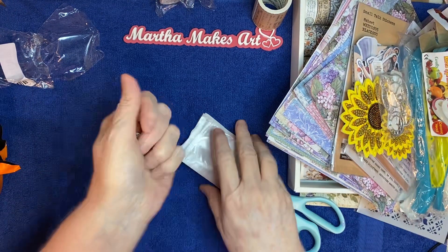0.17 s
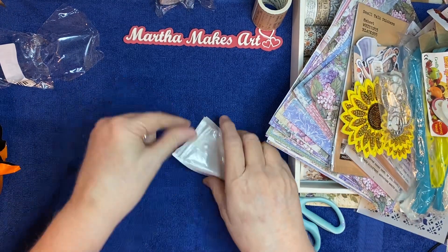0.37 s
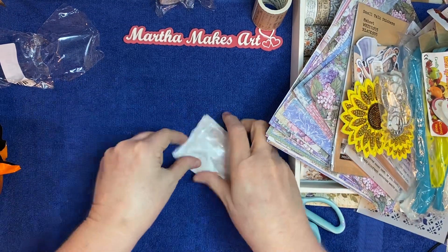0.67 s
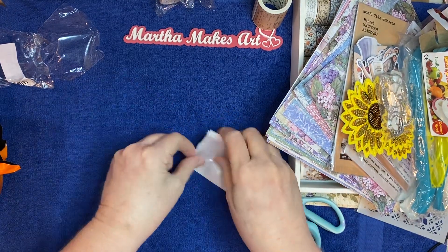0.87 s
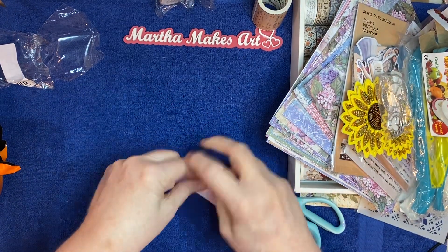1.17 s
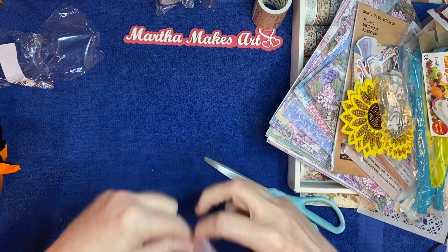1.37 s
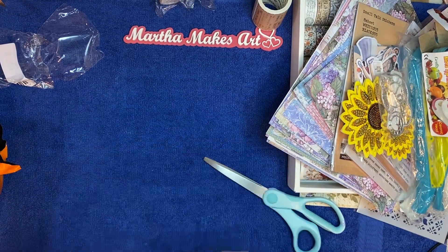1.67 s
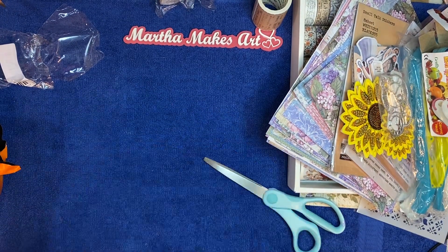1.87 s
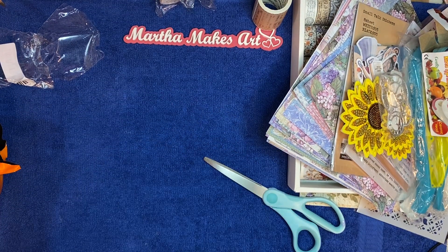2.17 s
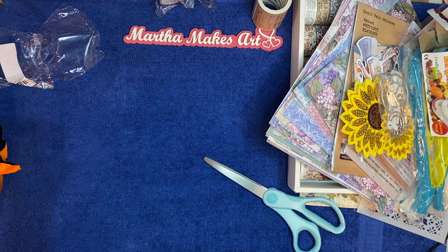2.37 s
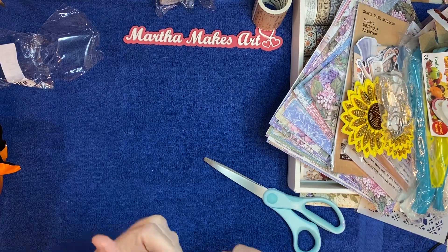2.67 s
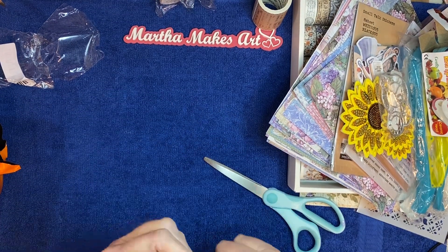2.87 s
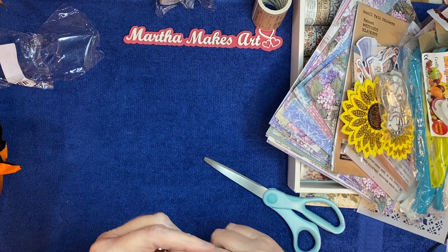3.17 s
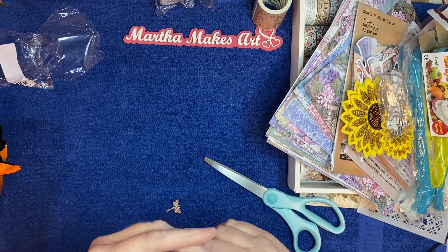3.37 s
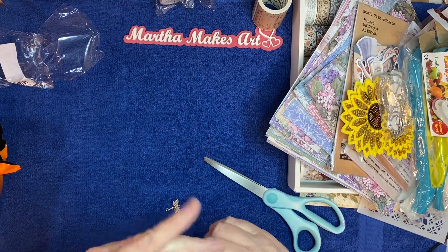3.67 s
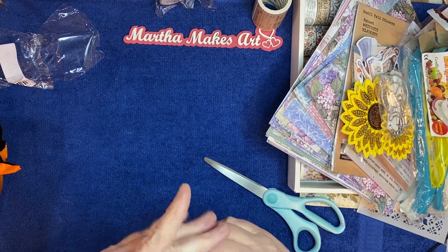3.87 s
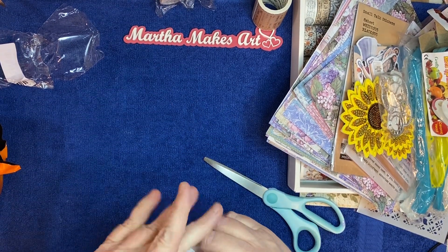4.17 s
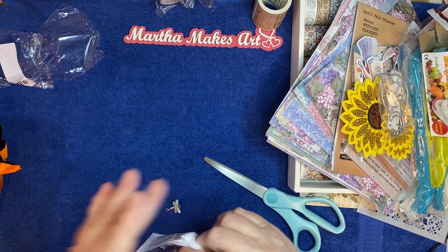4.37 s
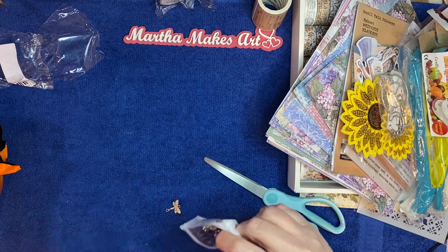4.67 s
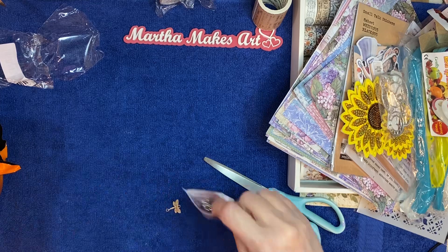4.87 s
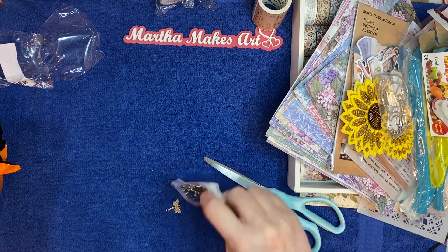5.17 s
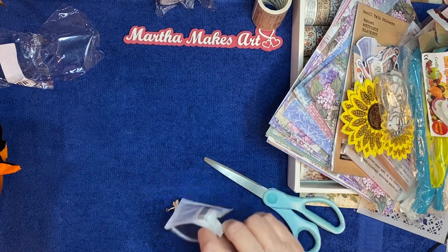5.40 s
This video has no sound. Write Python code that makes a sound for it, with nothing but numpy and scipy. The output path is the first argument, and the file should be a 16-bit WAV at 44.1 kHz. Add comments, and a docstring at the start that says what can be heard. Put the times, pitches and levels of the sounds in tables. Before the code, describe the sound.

Faint metal ticks begin, then thin film pops and crinkles, growing busier and louder before stopping. A lull leaves a quiet low hum and soft air. Metal charms then rattle in quick dry clicks, damped by bag and hand, with one late clatter. Very light film touches end it. Recorded near in a small, fairly dry room with narrow stereo.

```python
"""Thin plastic bag with metal charms

Hands work open a small, thin plastic bag at a cloth-covered table: the film rustles and snaps.
Small metal charms then slide and click inside it, and a last clatter follows as they are dropped.
Snaps and knocks are shaped noise bursts; rubbing is a dense train of tiny slips; bumps are damped sines.
A small room adds reflections and an appliance hums, heard through two closely spaced microphone ports."""
import sys
import numpy as np
from scipy import signal
from scipy.fft import rfft, irfft
from scipy.io import wavfile
from scipy.ndimage import uniform_filter1d

SR = 44100
rng = np.random.default_rng(int(sys.argv[2]) if len(sys.argv) > 2 else 0)


def wav_record(signal):
    """Record a signal, one row per channel, as 16-bit PCM in the file named by sys.argv[1]."""
    frames = np.transpose(np.atleast_2d(signal))
    bounded = np.clip(frames, -1, 1)
    # unit amplitude maps onto the largest positive 16-bit level
    quanta = np.round(bounded * 32767).astype(np.int16)
    wavfile.write(sys.argv[1], SR, quanta)


N = 244314  # samples

# All levels are relative: later gains scale each layer.
# Tones of the appliance motor and the mains: (f/Hz, level/dB)
HUM_TONES = [(44.2, -63), (58.6, -47), (104.5, -60), (117.3, -63), (120, -52), (171.3, -63), (240, -62),
             (1174, -75)]
# Colour of the moving air in the room: (f/Hz, spectral density level/dB)
AIR_COLOUR = [(25, -11.5), (52, 3), (90, -1.5), (300, -5.5), (410, 0), (600, -11.5), (1100, -16),
              (2200, -32.5), (3300, -43), (15000, -42.5)]

# Fingers stroke the film; the first, long stroke is the grip that holds the bag:
# (start t/s, length t/s, level/dB)
FILM_STROKES = [(0.18, 2.29, -57), (0.03, 0.12, -59.5), (0.174, 0.092, -48.5), (0.29, 0.23, -61),
                (0.765, 0.019, -40), (0.87, 0.083, -44.5), (1.35, 0.02, -42), (1.89, 0.18, -44),
                (2.60, 0.39, -64.5), (2.97, 0.079, -51), (3.83, 0.023, -46.5), (4.45, 0.11, -58.5),
                (4.7, 0.57, -66), (4.995, 0.047, -48), (5.05, 0.095, -61)]
STROKE_ATTACK_S, STROKE_RELEASE_S = 0.022, 0.011
HOLDING_DB = -70.5  # the film stirs faintly between strokes
# The film buckles: (t/s, level/dB, treble level/dB, resonance f/Hz, t60/s, at least 0.003 in use)
FILM_SNAPS = [(0.301, -22, -3, 1820, 0.0093), (0.334, -29.5, -10, 2250, 0.011),
              (0.485, -24, -6.5, 2580, 0.0062), (0.553, -28.5, -10.5, 3530, 0.0045),
              (0.638, -21.5, -5, 2200, 0.0097), (0.677, -26.5, -6, 2500, 0.017),
              (0.6898, -25.5, -18, 2550, 0.0078), (0.8222, -44, 4.5, 5380, 0.005),
              (0.862, -33, -10, 2300, 0.022), (0.8882, -18, -18.5, 2440, 0.0078),
              (0.8937, -20.5, -0.5, 6200, 0.012), (0.9037, -27, 6.5, 9100, 0.0024),
              (0.916, -25, -41, 2210, 0.0043), (0.9635, -36.5, 4.5, 5100, 0.012),
              (0.990, -30.5, 4.5, 6760, 0.012), (1.000, -31, -4, 2300, 0.02),
              (1.040, -30.5, 0, 7600, 0.011), (1.0913, -41.5, -5.5, 1420, 0.022),
              (1.130, -20.5, -1, 4000, 0.012), (1.153, -27.5, -30, 2100, 0.014),
              (1.208, -37, -17.5, 1640, 0.016), (1.232, -23, -31, 4300, 0.013),
              (1.2391, -21, -0.5, 5340, 0.0094), (1.2577, -31.5, 2.5, 3100, 0.016),
              (1.391, -30.5, -13, 3750, 0.013), (1.4034, -38, -2, 2630, 0.0075),
              (1.4482, -41, 7, 1970, 0.035), (1.542, -33, -26, 2820, 0.014),
              (1.588, -33, -4.5, 4900, 0.023), (1.636, -37, -4, 1880, 0.013),
              (1.653, -20.5, 1.5, 3700, 0.0073), (1.6558, -16.5, -1.5, 3200, 0.0039),
              (1.662, -28, -12.5, 3150, 0.013), (1.749, -21.5, 0, 3300, 0.007),
              (1.757, -17.5, 1, 4700, 0.013), (1.773, -27.5, -8, 2700, 0.025),
              (1.874, -22, -4, 3630, 0.014), (1.898, -23, -16, 4200, 0.01),
              (1.9185, -13.5, -5.5, 4940, 0.011), (1.9405, -14, 2.5, 6940, 0.017),
              (1.9525, -19.5, -5, 2350, 0.017), (1.970, -16, -10, 5000, .021),
              (2.025, -13.5, -3, 2110, 0.017), (2.040, -30, -11.5, 2460, 0.012),
              (2.093, -26.5, -0.5, 7600, 0.0069), (2.164, -25, -5.5, 2440, 0.013),
              (2.225, -24, -21, 2480, 0.016), (2.2844, -32.5, -3, 1460, 0.021),
              (2.297, -19, -8.5, 2430, 0.018), (2.393, -24.5, -3, 6540, 0.0089),
              (2.4407, -29.5, -7, 1926, 0.005), (4.823, -61, 7, 2400, 0.017),
              (4.8665, -52, -15, 1720, 0.027), (5.083, -49, -5, 2500, 0.016)]
SNAP_WIDTH_HZ = 240  # half-width of the leading resonance when it lies at 2500 Hz
# Colours of a snap, a light swish and the crinkle of a firm touch: (f/Hz, spectral density level/dB)
FILM_COLOUR = [(200, -8), (400, -3.5), (650, -2.5), (1050, -10), (1500, -3), (2300, -1.5), (3200, -6),
               (5000, -1.5), (6200, -5.5), (8000, -3.5), (10000, -3), (12500, -9.5), (15500, -7)]
SWISH_COLOUR = [(1000, 4), (2300, 1.5), (3300, -2), (5500, -3), (15000, -5)]
CRINKLE_COLOUR = [(1400, -1), (2400, 4.5), (3400, -8.5), (5300, -0.5), (10000, -10.5), (15000, -5)]
CLUMP_HZ = 30  # rate at which the slips of each fold swell and rest

# Loose charms shift and tinkle: (start t/s, length t/s, level/dB)
CHARM_TINKLES = [(0.06, 0.018, -43), (0.11, 0.01, -40.5), (2.615, 0.012, -50), (2.87, 0.096, -52),
                 (2.98, 0.14, -45), (3.34, 0.03, -51), (3.67, 0.042, -42), (4.43, 0.12, -53),
                 (4.995, 0.05, -51)]
# Charms knock together in the bag and the hand:
# (t/s, level/dB, treble level/dB, resonance f/Hz, t60/s)
CHARM_KNOCKS = [(2.992, -41, -6, 1780, 0.0143), (3.018, -36.5, 9.5, 1910, .012),
                (3.092, -27, -5, 1906, 0.011), (3.1005, -28, -5, 1673, 0.0068),
                (3.141, -15.5, -8.5, 1584, .016), (3.2065, -25.5, -3, 6480, 0.011),
                (3.2187, -27.5, -1, 1760, 0.015), (3.2695, -26.5, 8.5, 7640, 0.019),
                (3.286, -18.5, -1, 1364, 0.029), (3.3455, -17, 4, 7920, 0.021),
                (3.3645, -23.5, 1, 6650, 0.017), (3.398, -26, -11, 1540, 0.022),
                (3.4152, -16.5, -2.5, 7450, 0.037), (3.466, -21.5, 3.5, 1470, 0.031),
                (3.514, -28.5, -3, 5200, 0.01), (3.5325, -19.5, -5, 2380, 0.0088),
                (3.562, -18.5, -0.5, 5250, .011), (3.6025, -11.5, 1, 5100, 0.025),
                (3.6155, -21.5, 5, 1530, 0.094), (3.675, -23.5, 6, 2580, 0.055),
                (3.727, -40.5, 12, 10800, 0.01), (3.7397, -29.5, -12, 2190, 0.0054),
                (3.825, -39, 10, 2450, 0.0051), (3.8855, -36, 1, 2490, 0.0129),
                (3.903, -39, -1, 5640, 0.03), (3.9332, -30, 6, 9500, 0.0116),
                (4.1962, -36, 0, 1830, 0.0282), (4.2445, -16, 4, 2410, 0.026),
                (4.2495, -19, -8, 1610, 0.029), (4.422, -51, 18, 9430, 0.007)]
KNOCK_LEAD_S = 0.0032  # a charm scrapes only briefly before it knocks
# Charms slide along the bag; the first, long slide runs under the short pushes:
# (start t/s, length t/s, level/dB)
CHARM_SLIDES = [(3.12, 0.6, -44.5), (3.123, 0.03, -33.5), (3.375, 0.026, -39.5), (3.453, 0.062, -40.5),
                (3.538, 0.025, -44), (3.598, 0.12, -42), (4.226, 0.0165, -45)]
SLIDE_ATTACK_S, SLIDE_RELEASE_S = 0.0048, 0.008
# Colours of the tinkle and of the knocks and scrapes: (f/Hz, spectral density level/dB)
TINKLE_COLOUR = [(3000, -13), (5500, -24), (7700, 5), (10000, -13), (12500, -9), (15500, -5)]
CHARM_COLOUR = [(250, 1), (430, 4.5), (650, 4), (1050, -5), (1500, -6.5), (2300, -5.5), (3200, -7.5),
                (5000, -8.5), (6200, -10), (8200, -4), (10000, -17), (12500, -19), (15500, -18)]
# Resonances that every charm knock and scrape shares: (f/Hz, width/Hz, level/dB)
SHARED_MODES = [(1556, 270, 1.5), (2570, 77, -2.5)]

# Hands bump the padded table: (t/s, level/dB, f/Hz)
TABLE_THUMPS = [(3.27, -33.5, 245), (3.286, -38, 74), (3.642, -34, 148), (3.657, -40, 68),
                (3.675, -38.5, 230)]

# Decay of the room: (f/Hz, t60/s)
ROOM_DECAY = [(500, 0.32), (3000, 0.25), (16000, 0.033)]
# Likeness of the diffuse sound at the two ports: (f/Hz, likeness from 0 to 1)
PORT_LIKENESS = [(100, 1), (300, 0.71), (900, 0.09), (3000, 0), (8000, 1), (16000, 0.1)]
# Lead of the left port over the right: (f/Hz, phase/rad)
PORT_LEAD = [(0, 0), (1400, -.5), (2000, 0), (3000, 1.1), (3600, .4), (4400, .8), (5100, .1), (7300, 3.1),
             (9800, 6.1), (11200, 6.6), (16000, 12)]
# Left port minus right: (f/Hz, level difference/dB)
PORT_LEVEL = [(100, -1), (400, -1), (800, 6), (1400, -1), (2600, -2.5), (3500, -0.5), (4500, -2.5),
              (5500, -0.15)]
BAND_EDGE_HZ = 16300


def gain_of(db):
    """Decibels are a logarithmic measure of amplitude."""
    return 10 ** (np.asarray(db) / 20)


def evened(x):
    """Normalisation: the root mean square becomes 1."""
    return x / np.sqrt(np.mean(x ** 2) + 1e-20)


def read(points, hz):
    """Interpolation of a table along a logarithmic frequency axis."""
    f, value = np.transpose(points)
    return np.interp(np.log(hz + 1), np.log(f + 1), value)


def bins(size):
    """Frequencies of the discrete spectrum of this many samples."""
    return np.fft.rfftfreq(size, 1 / SR)


def add(mix, s, sound):
    """Superposition: a sound joins the mix at time s."""
    part = mix[max(round(s * SR), 0):][:len(sound)]
    part += sound[:len(part)]


def causal(gain):
    """Minimum phase: a filter of this magnitude does not respond before it is excited."""
    cepstrum = irfft(np.log(np.maximum(gain, gain.max() * 1e-5)))
    half = len(cepstrum) // 2
    # fold the cepstrum onto positive time
    cepstrum[1:half] *= 2
    cepstrum[half + 1:] = 0
    return np.exp(rfft(cepstrum))


def radiated(colour, hz, corner_hz=190):
    """Radiation of a small object: its colour, with little bass."""
    return gain_of(read(colour, hz)) * hz ** 2 / (hz ** 2 + corner_hz ** 2)


def diffuse(pair):
    """Partial coherence: two unrelated signals blend into the partly alike pair at the ports."""
    a, b = rfft(pair)
    same = np.clip(read(PORT_LIKENESS, bins(pair.shape[1])), 0, 1)
    shared = a * np.sqrt((1 + same) / 2)
    apart = b * np.sqrt((1 - same) / 2)
    return irfft(np.array([shared + apart, shared - apart]), pair.shape[1])


def appliance():
    """Steady periodic sources radiate fixed tones; turbulent air adds a soft broadband rush."""
    t = np.arange(N) / SR
    hum = np.zeros(N)
    for hz, db in HUM_TONES:
        hum += gain_of(db) * np.sqrt(2) * np.sin(2 * np.pi * (hz * t + rng.random()))
    noise = diffuse(rng.standard_normal((2, N)))
    air = irfft(rfft(noise) * gain_of(read(AIR_COLOUR, bins(N))), N)
    return gain_of(0.16) * hum + gain_of(-54.0) * evened(air)


def gestures(rows, attack_s, release_s):
    """Envelopes of hand movements swell, hold and die away; overlapping ones add in power."""
    t, power = np.arange(N) / SR, np.zeros(N)
    for start, length, db in rows:
        swell = np.clip((t - start) / attack_s, 0, 1)
        fade = np.exp(-np.maximum(t - start - length, 0) / release_s)
        power += (gain_of(db) * swell * fade) ** 2
    return np.sqrt(power)


def settling(rows, below_db, wait_s, fade_s, even_s=0.028):
    """Residual motion: the stir after a blow follows the energy of the blow and fades."""
    stirs = []
    for s, db, *_, t60 in rows:
        stirs.append((s, wait_s, db + below_db + 10 * np.log10(t60 / even_s)))
    return gestures(stirs, wait_s, fade_s)


def friction(colour, per_s, spread_db, grain_s, patch_db, clump_db=4, count=24):
    """Stick-slip: clumps of tiny uneven slips excite folds, each with its own resonance; rms 1."""
    t, slips = np.arange(SR // 50) / SR, np.zeros(N)
    for patch_hz in np.geomspace(1300, 11000, count):
        train = np.zeros(N)
        at = rng.integers(0, N, round(per_s * N / SR / count))
        # slow random swell of this fold
        moments = rng.standard_normal(int(CLUMP_HZ * N / SR))
        clump = np.interp(at, np.linspace(0, N, len(moments)), moments)
        unevenness = np.minimum(rng.exponential(1, len(at)), 3)
        train[at] = gain_of(clump_db * clump + spread_db * unevenness)
        patch = 1 + gain_of(patch_db) / (1 + (4 * (bins(len(t)) / patch_hz - 1)) ** 2)
        grain = rng.standard_normal(len(t)) * np.exp(-t / grain_s)
        crack = irfft(rfft(grain) * causal(patch))
        slips += signal.oaconvolve(train, crack - crack.mean())[:N]
    return evened(irfft(rfft(slips) * radiated(colour, bins(N)), N))


def with_body(rows, even_s, db_per_doubling):
    """Moving mass: a longer blow moves more material, so has more low body; none extra at even_s."""
    return [(s, db, db_per_doubling * np.log2(t60 / even_s), treble_db, hz, t60)
            for s, db, treble_db, hz, t60 in rows]


def blows(rows, colour, peak_db, peak_width, body_hz, treble_hz, rise_s, lead_db, lead_s,
          ripple_db=2.0, size=4096):
    """Impact: a brief scrape, then a dense burst with one leading resonance and random lesser ones."""
    out, hz = np.zeros(N), bins(size)
    t = (np.arange(size) - size // 8) / SR  # zero at the blow
    after, before = np.maximum(t, 0), np.maximum(-t, 0)
    scrape = gain_of(lead_db) * np.exp(-before / lead_s - after / rise_s)
    base = radiated(colour, hz)
    draws = rng.standard_normal((len(rows), 2, size))
    for (s, db, body_db, treble_db, ring_hz, t60), (noise, folds) in zip(rows, draws):
        decay = np.exp(-np.log(1000) * after / max(t60, 0.003))
        strike = (1 - np.exp(-after / rise_s)) * decay
        burst = rfft(noise * (scrape + strike / strike.max()))
        # whiten: every band gets its share
        burst *= causal(uniform_filter1d(abs(burst) ** 2, size=110) ** -0.5)
        # the leading resonance widens as the square root of its frequency
        detuning = ((hz - ring_hz) / peak_width) ** 2 * 2500 / ring_hz
        shape = base * (1 + gain_of(peak_db) / (1 + detuning))
        # lesser resonances change with every fold
        smooth = uniform_filter1d(folds[:len(hz)], size=16)
        ripple = evened(uniform_filter1d(smooth, size=16))
        shape *= evened(gain_of(ripple_db * ripple))
        body = body_db / (1 + (hz / body_hz) ** 4)
        treble = treble_db * hz ** 6 / (hz ** 6 + treble_hz ** 6)
        shape *= gain_of(body + treble)
        crack = irfft(burst * causal(shape / np.sqrt(np.mean(base ** 2))))
        millisecond = np.sqrt(SR / 1000)  # level refers to the energy of one millisecond
        add(out, s + t[0], gain_of(db) * millisecond * crack)
    return out


def bag():
    """Buckling film snaps, then crinkles as it settles; a light touch swishes, a firm one also crinkles."""
    crinkle = friction(CRINKLE_COLOUR, per_s=520, spread_db=3.2, grain_s=0.0018, patch_db=20.5,
                       clump_db=3.5)
    swish = friction(SWISH_COLOUR, per_s=4500, spread_db=2, grain_s=0.003, patch_db=22, clump_db=4)
    strokes = gestures(FILM_STROKES, STROKE_ATTACK_S, STROKE_RELEASE_S)
    strokes = np.hypot(strokes, gain_of(HOLDING_DB))
    stir = settling(FILM_SNAPS, below_db=-21.5, wait_s=0.0071, fade_s=0.018)
    rubbing = np.hypot(strokes, stir)
    firm = rubbing / (rubbing + gain_of(-60))
    rustle = rubbing * (firm * crinkle + np.sqrt(1 - firm ** 2) * swish)
    rows = with_body(FILM_SNAPS, even_s=0.015, db_per_doubling=17.0)
    snaps = blows(rows, FILM_COLOUR, peak_db=5.5, peak_width=SNAP_WIDTH_HZ, body_hz=1160,
                  treble_hz=5860, rise_s=0.00062, lead_db=-16.5, lead_s=0.0018)
    return snaps + gain_of(-2.5) * rustle


def ringing(x, modes):
    """Modal resonance: narrow resonances add to the direct sound."""
    hz = bins(N)
    response = 1 + sum(gain_of(db) / (1 + 2j * (hz - f) / width) for f, width, db in modes)
    return irfft(rfft(x) * response, N)


def charms():
    """Impact and friction of metal: damped by bag and hand, charms knock, scrape and tinkle."""
    tinkling = gestures(CHARM_TINKLES, attack_s=0.0031, release_s=0.0094)
    tinkle = tinkling * friction(TINKLE_COLOUR, per_s=740, spread_db=11.5, grain_s=0.0032,
                                 patch_db=-10)
    rows = with_body(CHARM_KNOCKS, even_s=0.049, db_per_doubling=3.5)
    knocks = blows(rows, CHARM_COLOUR, peak_db=6.5, peak_width=160, body_hz=1140,
                   treble_hz=5790, rise_s=0.00065, lead_db=-9.0, lead_s=KNOCK_LEAD_S)
    slides = gestures(CHARM_SLIDES, SLIDE_ATTACK_S, SLIDE_RELEASE_S)
    stir = settling(CHARM_KNOCKS, below_db=-23.5, wait_s=0.0057, fade_s=0.039)
    scrape = friction(CHARM_COLOUR, per_s=380, spread_db=3.0, grain_s=0.0013, patch_db=17)
    contact = knocks + np.hypot(slides, stir) * scrape
    return gain_of(-5.0) * (ringing(contact, SHARED_MODES) + tinkle)


def table(peak_s=0.011 / np.log(1000)):
    """Heavy damping: the cloth quenches each low bump within a few cycles at most."""
    out, t = np.zeros(N), np.arange(SR // 5) / SR
    u = t / peak_s  # the envelope peaks at u = 1
    for s, db, hz in TABLE_THUMPS:
        bump = u * np.exp(1 - u) * np.sin(2 * np.pi * hz * t)
        add(out, s, gain_of(db) * np.sqrt(2) * bump)
    return out


def surfaces(x, uneven=0.033, wall_s=0.0098, wall_db=-17):
    """Directivity and reflection: each fold favours one port; a near wall returns one echo."""
    lowpass = np.exp(-(bins(N) / 250) ** 2)
    facing = evened(irfft(rfft(rng.standard_normal(N)) * lowpass, N))
    echo = np.zeros(N)
    add(echo, wall_s, gain_of(wall_db) * x)
    return echo + uneven * facing * np.array([x, -x])


def room(x, first_s=0.006, early_db=5, early_s=0.017):
    """Reverberation: strong early reflections, then a tail in which each band has its own decay."""
    taps = rng.standard_normal((2, SR)) * (rng.random((2, SR)) < 5000 / SR)
    hz, t, z = signal.stft(taps, SR, nperseg=256)
    z = z * np.exp(-np.log(1000) * t / read(ROOM_DECAY, hz)[:, None])
    tail = signal.istft(z, SR, nperseg=256)[1][:, :SR]
    t = np.arange(SR) / SR
    early = 1 + gain_of(early_db) * np.exp(-t / early_s)
    tail = diffuse(tail * (t > first_s) * early)
    return signal.fftconvolve(x[None], tail / np.linalg.norm(tail[0]), axes=1)[:, :N]


def scene():
    """Superposition of the bag, charms and hands close by, their reflections, and the hum."""
    handling = bag() + charms() + table()
    return handling + surfaces(handling) + gain_of(-12.0) * room(handling) + appliance()


def record(dry):
    """Two-port reception: the ports differ in phase and level; a low-pass then limits the band."""
    hz = bins(N)
    lead = np.interp(hz, *np.transpose(PORT_LEAD))
    # each port takes half of the difference
    turn = np.exp(0.5j * lead) * gain_of(read(PORT_LEVEL, hz) / 2)
    ports = irfft(rfft(dry) * np.array([turn, 1 / turn]), N)
    lowpass = signal.firwin(161, BAND_EDGE_HZ, window=("kaiser", 8), fs=SR)
    return signal.oaconvolve(ports, lowpass[None], "same")


dry = scene()
out = record(dry)
wav_record(out)
```